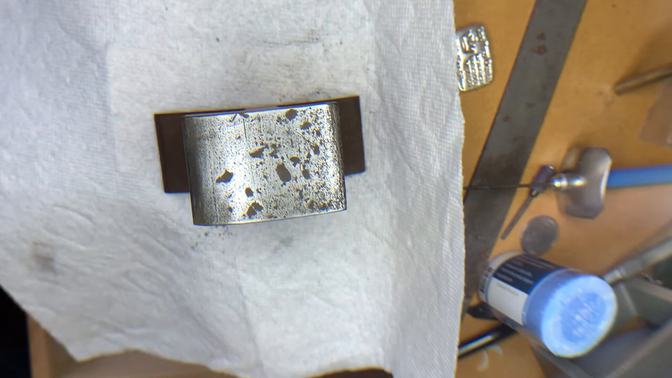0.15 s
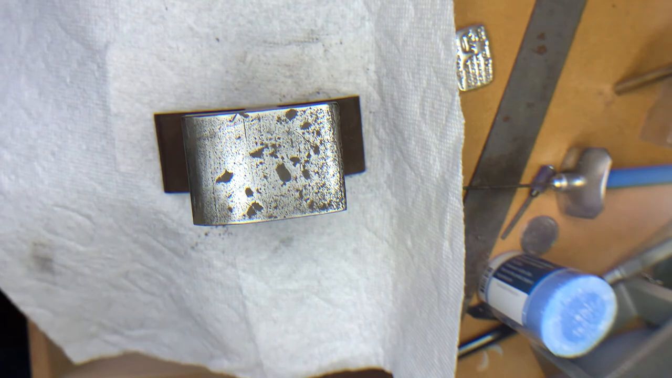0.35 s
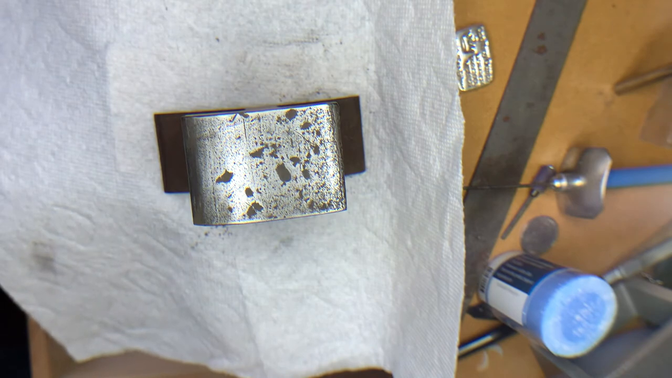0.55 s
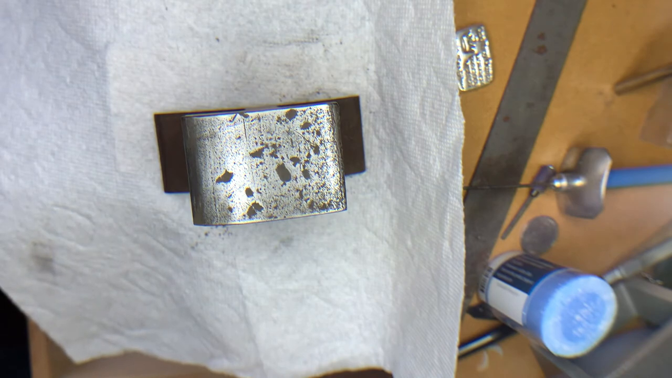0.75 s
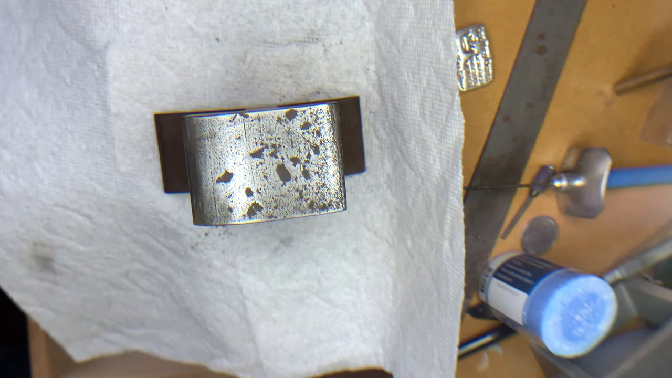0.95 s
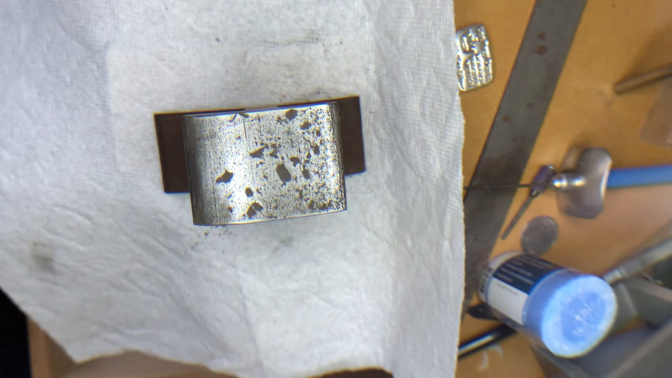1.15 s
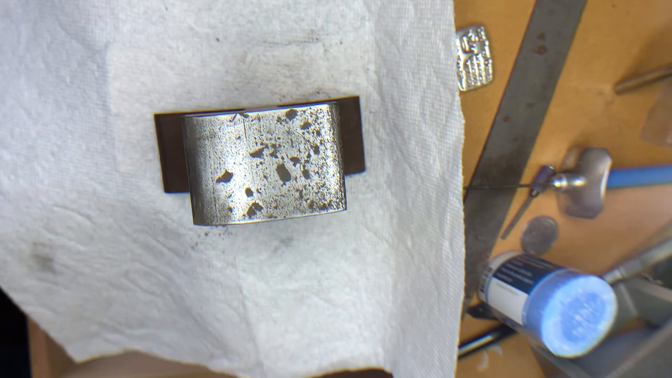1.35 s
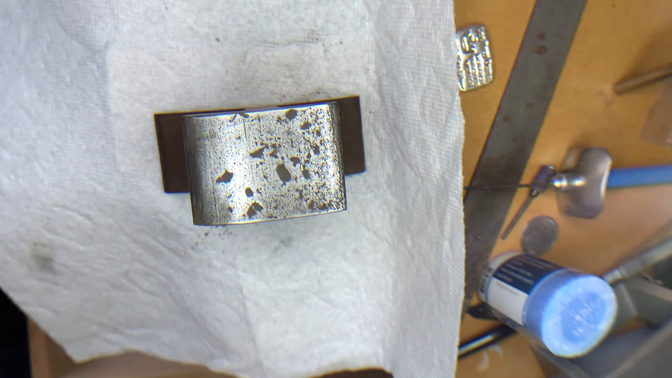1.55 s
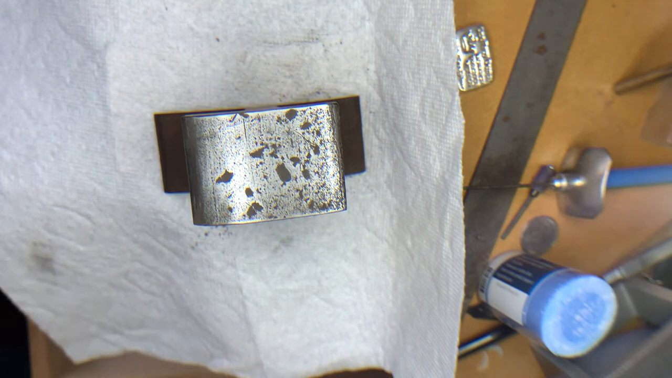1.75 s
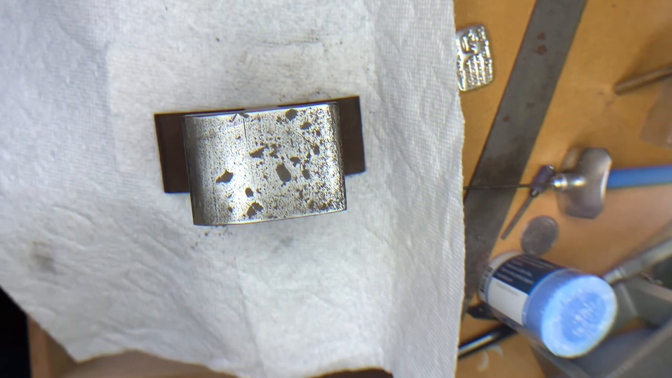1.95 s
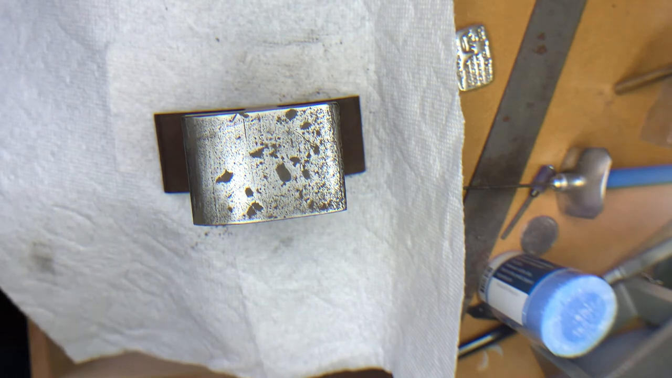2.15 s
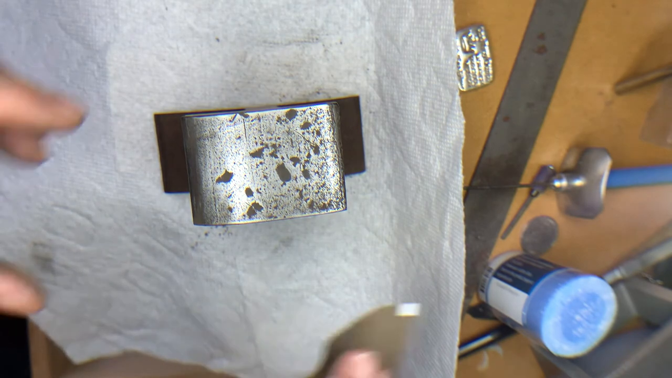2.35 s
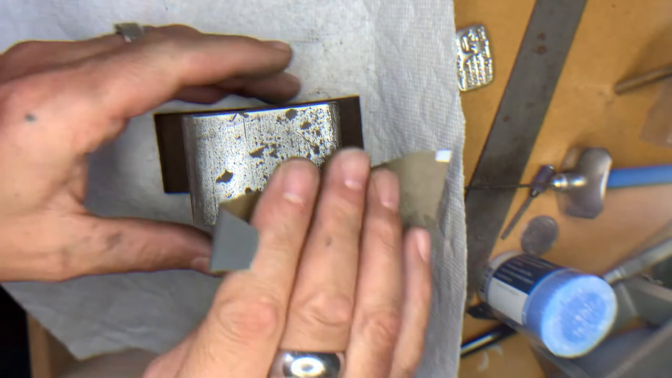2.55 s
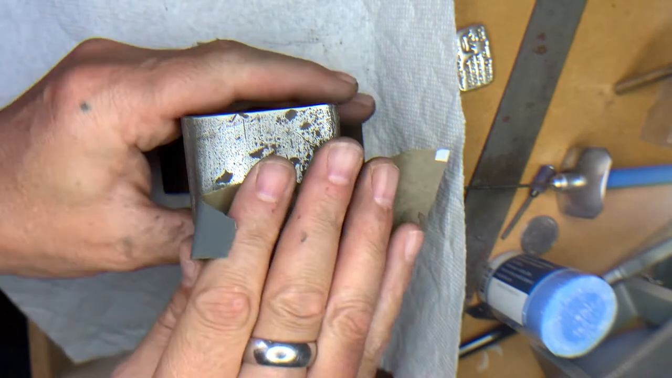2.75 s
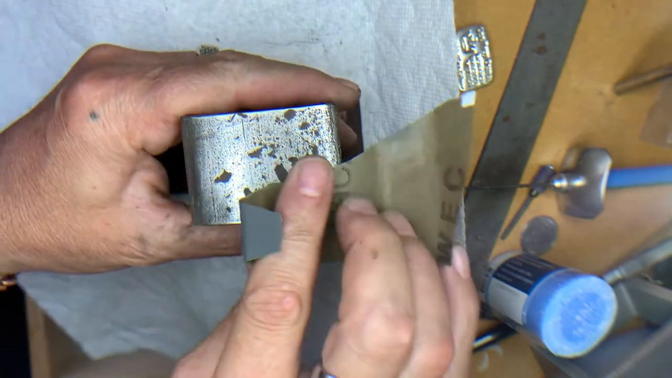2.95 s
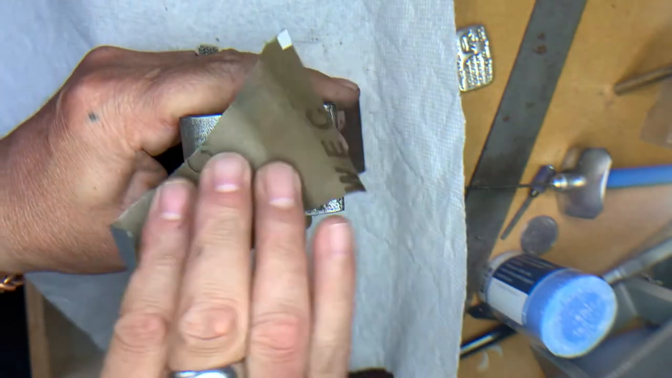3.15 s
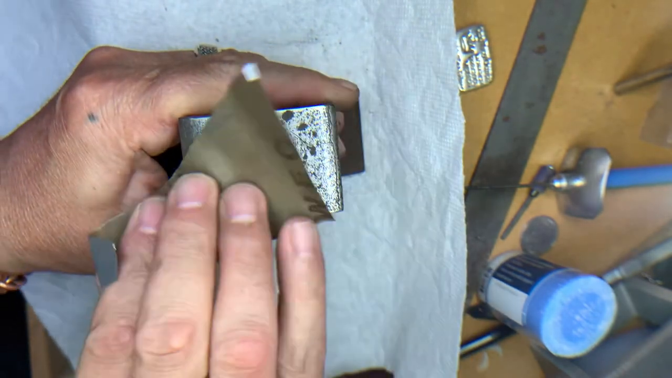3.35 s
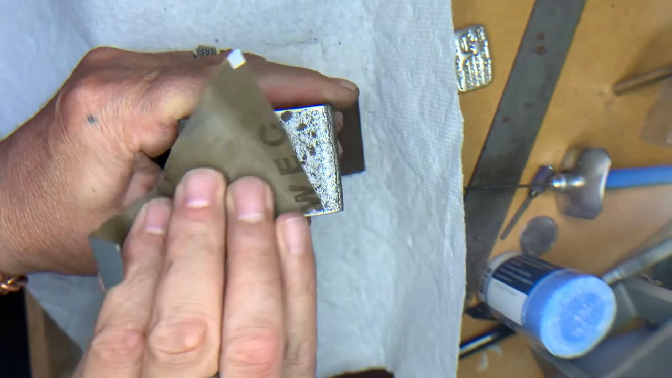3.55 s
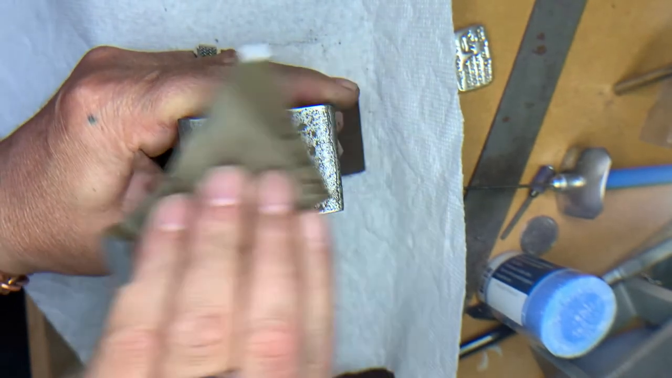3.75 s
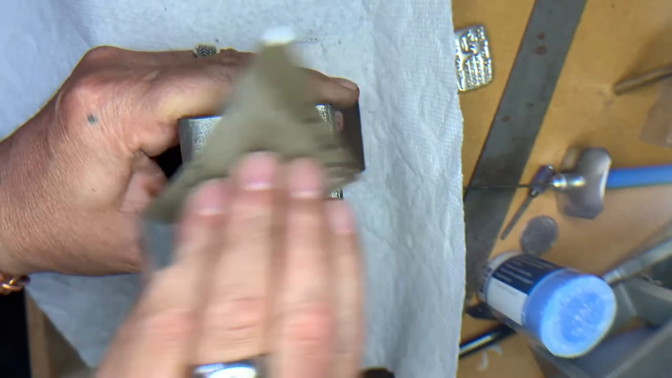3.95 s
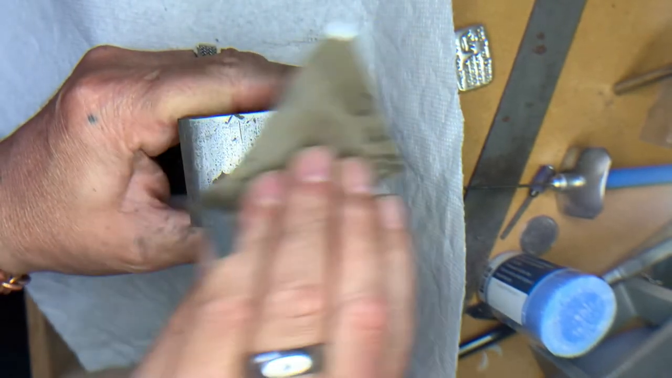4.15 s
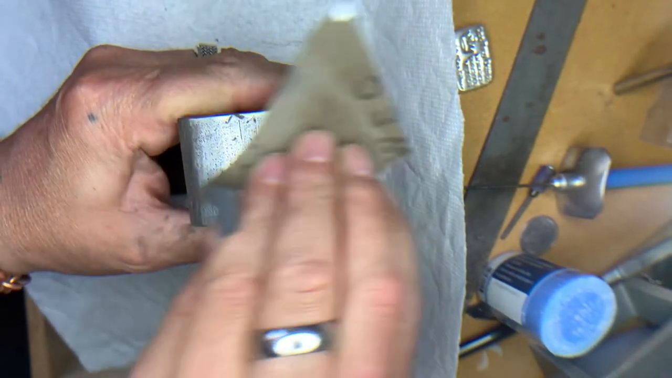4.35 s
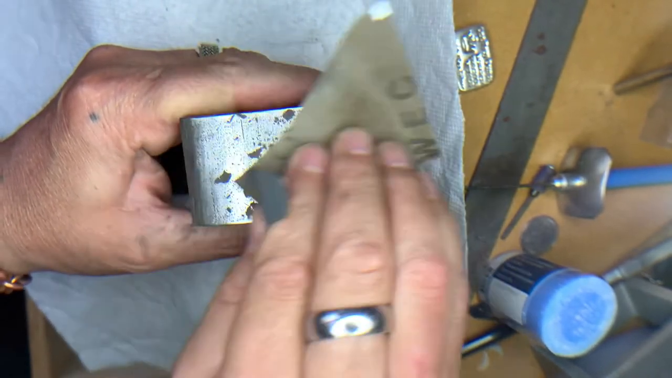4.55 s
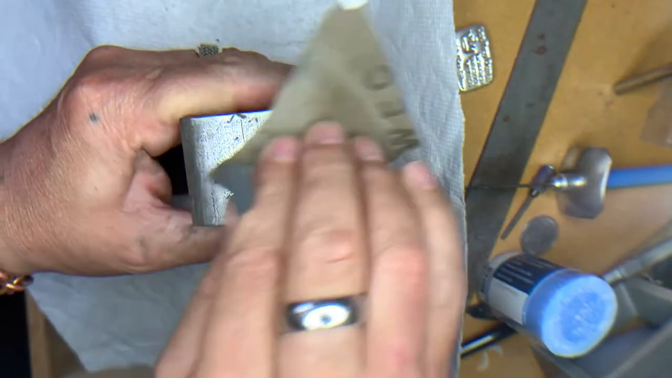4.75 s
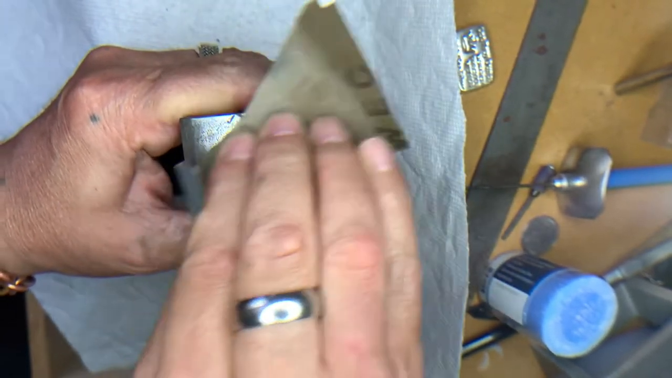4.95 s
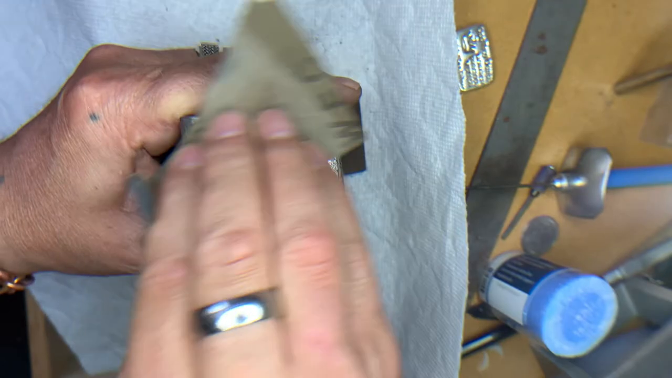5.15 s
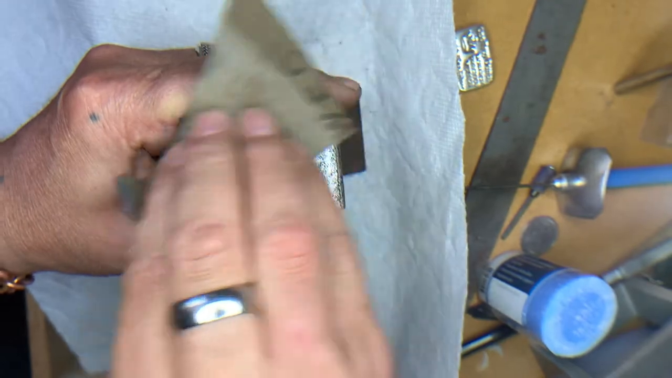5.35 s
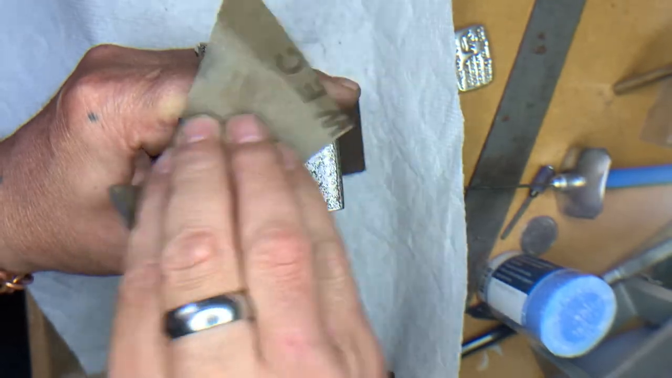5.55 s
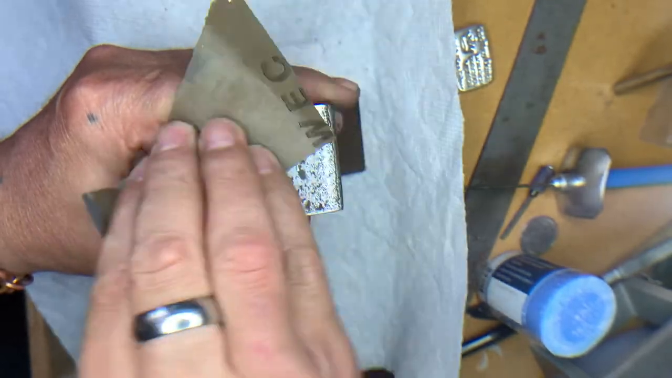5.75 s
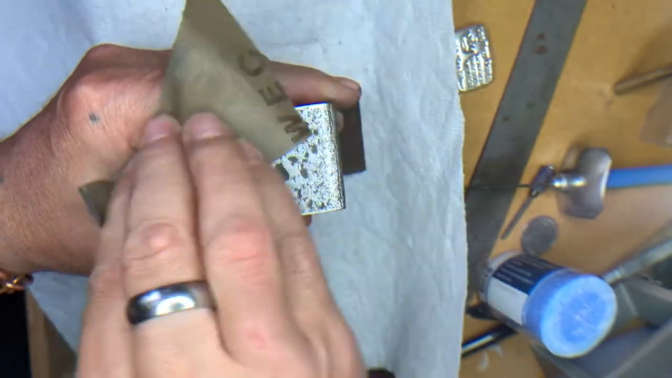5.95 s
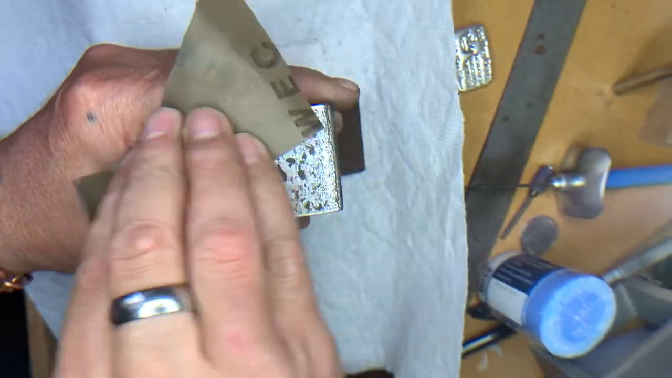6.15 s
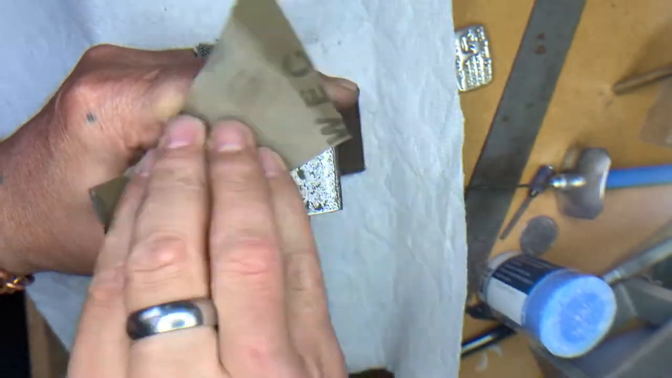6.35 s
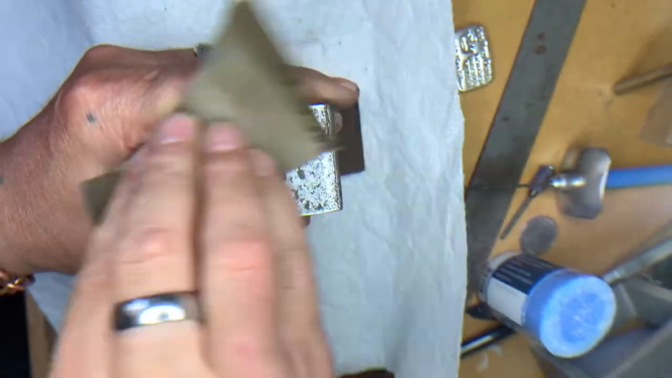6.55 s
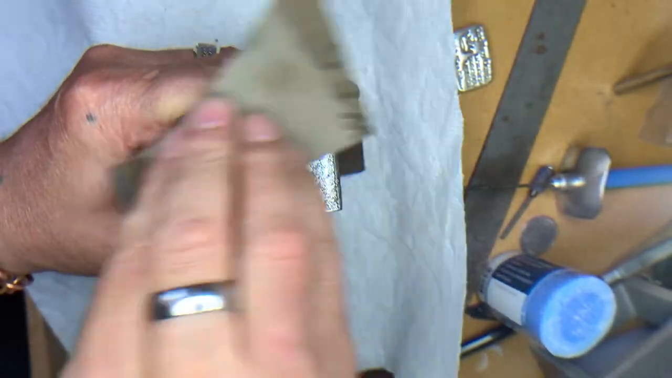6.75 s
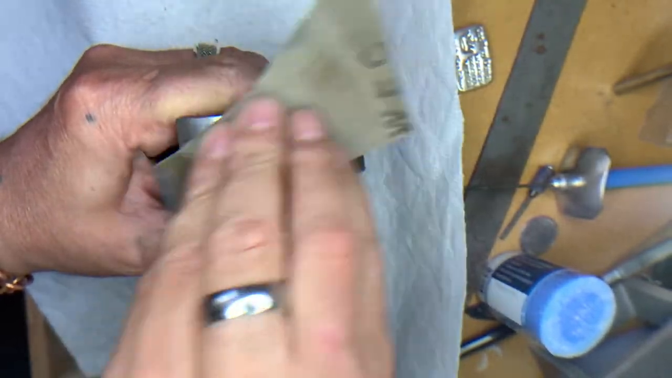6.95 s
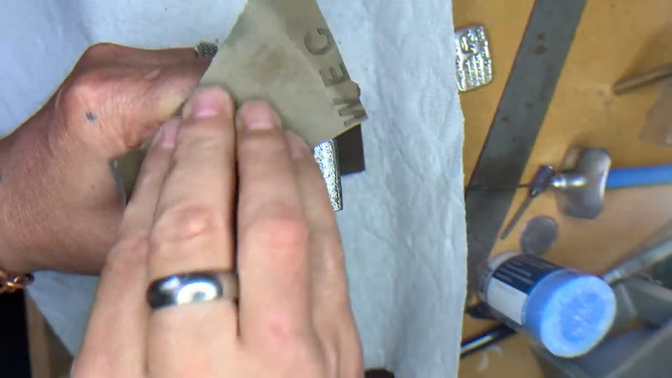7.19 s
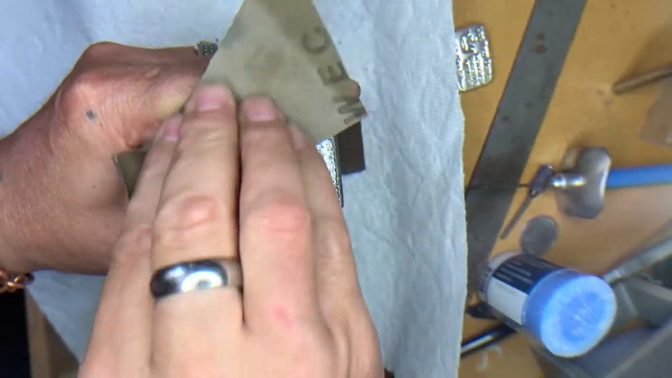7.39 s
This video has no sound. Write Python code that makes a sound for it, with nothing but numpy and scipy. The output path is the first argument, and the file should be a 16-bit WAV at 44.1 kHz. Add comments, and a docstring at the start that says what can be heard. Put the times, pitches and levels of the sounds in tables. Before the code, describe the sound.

Wooden knocks and crisp snaps of stiff sandpaper at a workbench, then fast, steady, scratchy hand sanding on a small steel block.

```python
"""At a workbench in a small room, heard close up: something wooden slides and bumps, and sandpaper is creased.
Then the paper is rubbed to and fro over a small steel block, about nine strokes a second once it is going.
Showers of tiny random impacts make the scraping, rasping, hissing and crackling.
Short decaying swings make the knocks, clacks and snaps; filtered noise rings wood, block and bench.
Gliding tones make squeaks and thuds, and steady tones a thin metal ring."""
import sys
import numpy as np
from scipy import signal
from scipy.fft import rfft, irfft, next_fast_len
from scipy.io import wavfile
from scipy.ndimage import map_coordinates

SR = 44100
rng = np.random.default_rng(int(sys.argv[2]) if len(sys.argv) > 2 else 0)


def log_audio(samples):
    """Write samples as a 16-bit WAV file to the path given in sys.argv[1]."""
    # one column per channel
    frames = np.atleast_2d(samples).T
    # limit to full scale, then quantise
    limited = np.clip(frames, -1, 1)
    pcm = np.round(limited * 32767).astype(np.int16)
    wavfile.write(sys.argv[1], SR, pcm)


N = 327219
T = np.arange(N) / SR  # the time of every sample, in seconds


def amp(db):
    """Decibels to gain."""
    return 10 ** (np.asarray(db) / 20)


def unit(x):
    """Scale to rms 1."""
    return x / np.sqrt(np.mean(x ** 2) + 1e-20)


def along(points, hz):
    """Read a curve of (Hz, value) points on a log frequency axis."""
    f, v = np.transpose(points)
    return np.interp(np.log(hz + 1), np.log(f + 1), v)


def wobble(rate):
    """A smooth random curve with rate random points a second."""
    points = rng.standard_normal(int(N * rate / SR) + 4)
    return map_coordinates(points, [T * rate])


def filtered(x, response):
    """Multiply the spectrum of x by a complex response of frequency."""
    m = next_fast_len(N + SR // 4)
    return irfft(rfft(x, m) * response(np.fft.rfftfreq(m, 1 / SR)), m)[..., :N]


def shape(points):
    """The response of a broad spectrum, from (Hz, dB) points."""
    return lambda hz: amp(along(points, hz))


def body(modes):
    """A body rings at several resonances, which are summed with alternating sign."""
    def response(f):
        total = 0
        for k, (center, width, db) in enumerate(modes):
            resonance = 1j * f * width / (center * center - f * f + 1j * f * width)
            total = total + (-1) ** k * amp(db) * resonance
        return total
    return response


def noise():
    """Two unrelated white noises."""
    return rng.standard_normal((2, N))


def grit(rate, spread_db):
    """Tiny impacts of uneven size, rate a second, at a steady mean power."""
    chance = np.clip(rate / SR, 1e-4, 1)
    hits = (rng.random(N) < chance) / np.sqrt(chance)
    sizes = amp(spread_db * rng.standard_normal(N))
    return unit(hits * sizes * noise())


def bursts(times, levels_db, t60):
    """Noise jumps up at each contact and falls by 60 dB in t60 seconds."""
    power = np.zeros(N + SR)
    fall = amp(-60 * np.arange(SR // 3) / SR / t60) ** 2
    for s, db in zip(times, levels_db):
        power[round(s * SR):][:len(fall)] += amp(db) ** 2 * fall
    return np.sqrt(power[:N]) * noise()


def struck(drive, response):
    """Send a drive through a response scaled to unit average power gain."""
    norm = np.sqrt(np.mean(np.abs(response(np.linspace(0, SR / 2, 2 ** 12))) ** 2))
    return filtered(drive, response) / norm


def patchy(x, depth_db, width_hz, life):
    """Colour drifts at random: humps about width_hz wide last about life seconds."""
    hz, t, z = signal.stft(x, SR, nperseg=1024)
    rows, cols = np.meshgrid(hz / width_hz, t / life, indexing="ij")
    knots = rng.standard_normal((2, 512, 512))
    field = np.array([map_coordinates(k, [rows, cols], order=1, mode="wrap") for k in knots])
    gain = amp(depth_db * unit(field))
    return signal.istft(z * unit(gain), SR, nperseg=1024)[1][:, :N]


def arch(place, crest, pointed):
    """The speed of a hand movement: nil at place 0 and 1, highest at the crest."""
    lean = np.log(.5) / np.log(np.clip(crest, .1, .9))
    return np.abs(np.sin(np.pi * np.clip(place, 0, 1) ** lean)) ** np.abs(pointed)


def swells(rows):
    """Each movement swells and fades in one arch; gives a gain curve for each dB column."""
    out = np.zeros((len(rows[0]) - 2, N + SR))
    for s, length, *db in rows:
        swell = arch(np.arange(round(length * SR)) / (length * SR), crest=0.37, pointed=1)
        out[:, round(s * SR):][:, :len(swell)] += amp(db)[:, None] * swell
    return out[:, :N]


def envelope(start, attack, hold, t60):
    """Rise, stay until hold seconds after the start, die away."""
    return np.clip((T - start) / attack, 0, 1) * amp(-60 * np.maximum(T - start - hold, 0) / t60)


def judder(s, length, hz, width, db):
    """One resonance, driven by noise as by rough friction, swells and fades."""
    out, t = np.zeros((2, N + SR)), np.arange(SR // 4) / SR
    ring = np.exp(-np.pi * width * t) * np.sin(2 * np.pi * hz * t)
    drive = rng.standard_normal((2, 2 * len(t)))
    tone = signal.fftconvolve(drive, ring[None], "valid", axes=1)[:, :len(t)]
    age = t / length * 3  # the swell is highest at a third of the length
    swell = age ** 2 * np.exp(2 - 2 * age)
    burst = tone * swell
    level = amp(db) * np.sqrt(2 * np.sum(swell ** 2) / np.sum(burst ** 2))
    out[:, round(s * SR):][:, :len(t)] += level * burst
    return out[:, :N]


def clacks(times, levels_db, pitches_hz, cycles):
    """Hard contacts: a swing whose envelope peaks after so many cycles, then dies quickly."""
    out, t = np.zeros((2, N + SR)), np.arange(SR // 16) / SR
    for s, db, hz in zip(times, levels_db, pitches_hz):
        age = t * hz / cycles
        swing = age * np.exp(1 - age) * np.sin(2 * np.pi * hz * t)
        out[0, round(s * SR):][:len(t)] += amp(db) * swing
    return out[:, :N]


# How long the room rings. Each row: frequency in Hz, time to fall by 60 dB in seconds.
ROOM_DECAY = [(150, 0.22), (1000, 0.24), (4000, 0.19), (14000, 0.087)]


def room(x):
    """The walls answer with a short noise tail in which each frequency dies at its own speed."""
    hz, t, z = signal.stft(rng.standard_normal((2, SR // 2)), SR, nperseg=256)
    fall = amp(-60 * t / along(ROOM_DECAY, hz)[:, None])
    tail = signal.istft(z * fall, SR, nperseg=256)[1]
    return signal.fftconvolve(x, tail / np.linalg.norm(tail[0]), axes=1)[:, :N]


# How alike left and right are. Each row: frequency in Hz, likeness from 0 to 1.
LIKENESS = [(100, .9), (350, .88), (700, .65), (2000, .45), (6500, .4), (8500, .95), (15000, .92)]
# The phase between left and right. Each row: frequency in Hz, lead of the left in radians (minus: it lags).
LEFT_LEAD = [(0, 0), (300, -.3), (1100, -1.8), (1900, -.1), (3200, -2.8), (5600, -8.6), (6700, -6.1),
             (8600, -9.4), (16000, -19)]


def ports(pair):
    """Two close microphone ports share part of the sound; the left one lags in phase."""
    def turn(hz):
        return np.arccos(np.clip(along(LIKENESS, hz), 0, 1)) / 2

    def lead(hz):
        return np.exp(.5j * np.interp(hz, *np.transpose(LEFT_LEAD)) * np.array([[1], [-1]]))

    # the first signal goes to both ports, the second with opposite signs
    mid, side = filtered(pair, lambda hz: np.array([np.cos(turn(hz)), np.sin(turn(hz))]))
    return filtered(np.array([mid + side, mid - side]), lead)


# How the bench top rings. Each row: frequency in Hz, width in Hz, level in dB.
BENCH_MODES = [(57, 44, -2), (156, 40, 4), (277, 47, -2.5), (321, 94, -4)]
# The colour of the room's air noise. Each row: frequency in Hz, relative level in dB per Hz.
AIR_SPECTRUM = [(20, -36), (50, 5.5), (130, -7.5), (250, -20.5), (600, -19.5), (2000, -14), (6000, -25),
                (15000, -40)]
REST_DB, LEAN_DB = -71.5, -62.5  # the bench shakes more as the hands lean in
LEAN_FROM_S, LEAN_FULL_S = 2.87, 5.1


def bench():
    """The working hands shake the bench top: low noise through its resonances, over steady air noise."""
    lean_db = np.interp(T, [LEAN_FROM_S, LEAN_FULL_S], [REST_DB, LEAN_DB])
    shake = amp(lean_db + wobble(18))
    low_band = shape([(22, -14), (50, 0), (400, 0), (1500, -14)])
    hum = filtered(noise(), lambda hz: body(BENCH_MODES)(hz) * low_band(hz))
    hum = patchy(hum, depth_db=2.5, width_hz=65.5, life=.07)
    air = filtered(noise(), shape(AIR_SPECTRUM))
    return shake * unit(hum) + amp(-69.0) * unit(air)


# How the rolling thing rings. Each row: frequency in Hz, width in Hz, level in dB.
ROLLER_MODES = [(127, 17, 4.5), (252, 40, 4.5), (293, 50, 2.5), (1210, 330, -11), (1700, 84, -7),
                (2200, 460, -9.5)]
ROLL_START_S, ROLL_HOLD_S, ROLL_T60, ROLL_DB = 1.89, 0.14, 1.94, -59  # T60 in seconds


def rolling():
    """Something rolls nearby and runs out: sparse impacts through low resonances, fading slowly."""
    band = shape([(40, -15), (100, 0), (2500, 0), (5000, -20)])
    roll = filtered(grit(900, spread_db=0.0), lambda hz: body(ROLLER_MODES)(hz) * band(hz))
    uneven = unit(roll * amp(1.6 * wobble(24.9)))
    return amp(ROLL_DB) * envelope(ROLL_START_S, attack=0.051, hold=ROLL_HOLD_S, t60=ROLL_T60) * uneven


# Something metal rings. Each row: frequency in Hz, level in dB.
METAL_TONES = [(1320, -49), (3122, -54), (4328, -59), (7350, -63), (9030, -52), (9895, -57)]


def metal():
    """Something metal rings thinly at the start: fading tones with a slightly restless phase."""
    ring = sum(amp(db) * np.sin(2 * np.pi * hz * T + .7 * wobble(114)) for hz, db in METAL_TONES)
    return np.array([ring * envelope(0, attack=.002, hold=0.027, t60=.2), np.zeros(N)])


# How the wood rings. Each row: frequency in Hz, width in Hz, level in dB.
WOOD_MODES = [(157, 16, 0.5), (279, 56, 2.5), (440, 60, 1.5), (680, 35, 7.5), (828, 27, 3), (948, 58, 1.5),
              (1280, 210, -1), (1840, 200, -11.5), (2720, 310, -12)]
# The colour of wood on wood. Each row: frequency in Hz, relative level in dB per Hz.
KNOCK_SPECTRUM = [(100, -9), (300, -7), (550, -8), (950, -0.5), (1500, -19), (2800, -14.5), (5000, -23),
                  (9000, -44), (15000, -39)]
SLIDE_DB, SLIDE_S, SLIDE_T60 = -42, 0.062, 0.35  # level, time until it fades in s, time to fall 60 dB in s


def wood_slide():
    """Wood slides on wood, then stops: dense tiny impacts ring the wood and die away."""
    slide = filtered(grit(5000, spread_db=-2.5),
                     lambda hz: (body(WOOD_MODES)(hz) + 1.5) * shape(KNOCK_SPECTRUM)(hz))
    return amp(SLIDE_DB) * envelope(0, attack=0.00058, hold=SLIDE_S, t60=SLIDE_T60) * unit(slide)


# Wood is bumped. Each row: start in seconds, clack level in dB, clack pitch in Hz, wood ring level in dB.
WOOD_KNOCKS = [(0.0569, -18, 950, -24.5), (.0635, -18, 625, -20.5), (0.0672, -26.5, 560, -23.5),
               (.081, -22, 716, -25), (.171, -38, 1230, -55), (0.41, -62, 590, -44.5),
               (.925, -39, 605, -35.5), (1.3037, -29.5, 920, -41), (1.427, -44, 706, -48),
               (1.46, -23, 1500, -44), (1.467, -33, 1550, -47), (1.698, -37, 484, -41),
               (1.726, -38.5, 1080, -41.5), (1.812, -45, 750, -42), (1.902, -42.5, 503, -51)]


def taps():
    """Each contact clacks and sends a noise burst through the resonances of the wood."""
    s, db, hz, ring_db = np.transpose(WOOD_KNOCKS)

    def wood(f):
        ring = body(WOOD_MODES)(f) * shape([(3000, 0), (8000, -25)])(f)
        return ring + 0.51 * shape(KNOCK_SPECTRUM)(f)

    return clacks(s, db, hz, cycles=0.55) + struck(bursts(s, ring_db, t60=0.03), wood)


# Soft weights land on the bench top. Each row: start in seconds, thump level in dB.
SOFT_LANDINGS = [(0.063, -35), (0.927, -44), (1.433, -48.5), (1.533, -35.5)]
THUD_S, THUD_GLIDE_S = 0.0057, 0.0067  # time to the peak, speed of the fall in pitch
THUD_START_HZ, THUD_END_HZ = 292, 89  # the pitch falls as the weight settles


def thuds():
    """A low thump falls in pitch, while a noise burst makes the bench shudder shortly."""
    out, t = np.zeros((2, N + SR)), np.arange(SR // 8) / SR
    hz = THUD_END_HZ + (THUD_START_HZ - THUD_END_HZ) * np.exp(-t / THUD_GLIDE_S)
    thump = t / THUD_S * np.exp(1 - t / THUD_S) * np.sin(2 * np.pi * np.cumsum(hz) / SR)
    for s, db in SOFT_LANDINGS:
        out[0, round(s * SR):][:len(t)] += amp(db) * thump
    s, db = np.transpose(SOFT_LANDINGS)
    low_cut = shape([(30, -20), (100, 0)])
    shudder = struck(bursts(s, db - 8, t60=0.06), lambda hz: body(BENCH_MODES)(hz) * low_cut(hz))
    return out[:, :N] + shudder


# Hands settle on a paper towel. Each row: start in seconds, length in seconds, level in dB.
TOWEL_TOUCHES = [(2.51, 0.14, -64.5), (2.772, 0.11, -58.5), (2.97, 0.094, -51.5)]


def towel():
    """Hands settle on a paper towel: soft grains, strongest near 900 Hz, swell with each movement."""
    rub = filtered(grit(3000, spread_db=3.0),
                   shape([(100, -1), (400, 4.5), (900, 7.5), (2000, 2.5), (6000, -13.5)]))
    return swells(TOWEL_TOUCHES)[0] * unit(rub)


# Stiff paper and wood snap sharply. Each row: start in seconds, level in dB, pitch in Hz.
SHARP_SNAPS = [(0.057, -36, 1860), (0.0646, -47, 2730), (.082, -37, 1990), (0.274, -49, 2870),
               (0.412, -43.5, 1840), (0.741, -54, 3450), (0.837, -45.5, 5130), (0.932, -37.5, 4150),
               (0.998, -49, 4200), (1.049, -55, 3580), (1.071, -53, 3560), (1.11, -49, 4050),
               (1.132, -41.5, 3100), (1.139, -33.5, 3320), (1.191, -45, 4600), (1.236, -56, 3350),
               (1.303, -35.5, 4520), (1.317, -36.5, 3650), (1.364, -44, 4830), (1.401, -45, 4840),
               (1.42, -46, 4880), (1.443, -34, 4800), (1.46, -35, 1970), (1.531, -38, 4530),
               (1.531, -39.5, 2040), (1.724, -44, 2130), (1.811, -44, 1706), (1.814, -39.5, 3240),
               (1.901, -51, 1970), (2.017, -57, 1480), (2.195, -49, 2140), (2.513, -52, 1590)]
SNAP_T60 = 0.067  # seconds for the crack to fall by 60 dB
SNAP_TAIL_DB, SNAP_TAIL_T60 = -24, 0.15  # the sheet quivers on after it


def snaps():
    """Each snap is a short swing plus a fading noise burst, peaked around its own pitch."""
    out, t = np.zeros((2, N + SR)), np.arange(SR // 8) / SR
    fall = amp(-60 * t / SNAP_T60) + amp(SNAP_TAIL_DB - 60 * t / SNAP_TAIL_T60)

    def band(x, hz, q):
        return signal.lfilter(*signal.iirpeak(min(hz, SR / 4), q, SR), x)

    for s, db, hz in SHARP_SNAPS:
        crack = fall * rng.standard_normal((2, len(t)))
        broad = band(band(crack, hz, .6), hz, .6)
        snap = broad + 1.8 * band(broad, hz, 11)
        level = amp(db - 4.0) * np.sqrt(2 * np.sum(fall ** 2) / np.sum(snap ** 2))
        out[:, round(s * SR):][:, :len(t)] += level * snap
    return out[:, :N] + clacks(*np.transpose(SHARP_SNAPS), cycles=3.6)


# Fingers slip on the sheet.
# Each row: start in seconds, length in seconds, first and last pitch in Hz, level in dB.
FINGER_SLIPS = [(0.182, 0.16, 3830, 3750, -66), (1.312, 0.032, 3600, 3810, -58),
                (1.401, .06, 4860, 4860, -50), (2.238, .04, 4750, 5000, -66)]
SQUEAK_ROUGH = .012  # unsteadiness, as a share of the pitch


def squeaks():
    """Brief finger slips sing on one unsteady, gliding pitch."""
    out = np.zeros((2, N + SR))
    for s, length, from_hz, to_hz, db in FINGER_SLIPS:
        place = np.arange(round(length * SR)) / (length * SR)
        glide = from_hz + (to_hz - from_hz) * place
        hz = glide * (1 + SQUEAK_ROUGH * wobble(600)[:len(place)])
        tone = arch(place, 0.36, 0.62) * np.sin(2 * np.pi * np.cumsum(hz) / SR)
        out[0, round(s * SR):][:len(place)] += amp(db) * tone
    return out[:, :N]


# The sheet shifts in the fingers.
# Each row: start in seconds, length in seconds, crackle in dB, grit brushing in dB.
SHEET_SHIFTS = [(.26, 0.093, -59, -84), (.51, 0.19, -63.5, -73.5), (.7, 0.24, -68, -84),
                (.82, 0.25, -54, -73), (1.03, 0.2, -57, -68), (1.18, 0.12, -53.5, -65),
                (1.39, 0.14, -45.5, -55), (1.51, 0.12, -59, -69), (1.785, 0.071, -51.5, -64),
                (1.86, 0.091, -52.5, -59.5), (2.0, 0.06, -62, -65.5), (2.13, 0.11, -58.5, -66),
                (2.31, 0.1, -63, -67), (2.505, 0.09, -53.5, -57.5), (2.57, 0.22, -61, -82)]
# The colour of the crackle. Each row: frequency in Hz, relative level in dB per Hz.
PAPER_SPECTRUM = [(300, -6), (1000, -2), (1600, 2.5), (2500, 0), (3200, 5.5), (3900, 5.5), (4700, 2.5),
                  (6000, 0.5), (7600, -9.5), (9000, -15), (10500, -10), (15500, -45)]
# The colour of the hissing grit. Each row: frequency in Hz, relative level in dB per Hz.
HISS_SPECTRUM = [(4500, -40), (6200, -11), (7000, -1.5), (7800, -3), (8400, -1), (10500, 1.5), (12500, 0),
                 (15700, -2)]
HELD_FROM_S, HELD_FOR_S, HELD_DB = 0.78, 1.7, -74.5  # the sheet crackles faintly as long as it is held
CLUMP_DB, CLUMP_RATE = 3, 98  # the crackle comes in clumps: depth, random points a second


def paper_handling():
    """Stiff paper crackles in clumps of tiny impacts, and its grit brushes in a brighter band."""
    rustle, brush = swells(SHEET_SHIFTS)
    held = amp(HELD_DB) * envelope(HELD_FROM_S, attack=0.03, hold=HELD_FOR_S, t60=0.33)
    clumps = grit(3500, spread_db=-0.5) * amp(CLUMP_DB * wobble(CLUMP_RATE))
    crackle = patchy(filtered(clumps, shape(PAPER_SPECTRUM)), depth_db=3, width_hz=300, life=.05)
    softer_top = shape([(9000, 0), (12000, -6), (16000, -9)])
    brushing = filtered(grit(4000, spread_db=3), lambda hz: shape(HISS_SPECTRUM)(hz) * softer_top(hz))
    brushing = patchy(brushing, depth_db=3, width_hz=400, life=.05)
    return np.hypot(rustle, held) * unit(crackle) + brush * unit(brushing)


# The bench top drones briefly. Each row: start in seconds, pitch in Hz, level in dB.
BENCH_DRONES = [(2.846, 172, -59.5), (3.13, 184, -61), (4.24, 181, -63), (4.499, 164, -59),
                (4.671, 155, -57), (4.91, 314, -57), (5.1, 320, -58), (5.27, 320, -58), (5.64, 83.5, -58),
                (5.96, 180, -58), (6.17, 313, -56.5), (6.25, 154, -58), (6.566, 347, -55.5),
                (6.795, 331, -47.5), (7.364, 329, -50)]
DRONE_S, DRONE_WIDTH_HZ = 0.081, 7.8


def drones():
    """The bench top drones along: narrow low resonances swell and fade under rough friction."""
    return sum(judder(s, DRONE_S, hz, DRONE_WIDTH_HZ, db) for s, hz, db in BENCH_DRONES)


# The block rocks on its foot. Each row: start in seconds, level in dB.
BLOCK_ROCKS = [(3.0, -42), (3.497, -43), (3.568, -36), (3.721, -39), (3.938, -45), (4.757, -44),
               (4.974, -47), (5.013, -44), (6.091, -37.5), (6.251, -49), (6.289, -39), (6.458, -47.5),
               (6.574, -36.5), (6.752, -47)]
# How the foot rings. Each row: frequency in Hz, width in Hz, level in dB.
FOOT_MODES = [(447, 47, 1), (725, 15, 3), (1020, 36, 6), (1474, 100, 2.5)]
FALL_BACK_S = .0075  # the second contact follows, just as strong
CLACK_HZ, CLACK_DB, FOOT_DB = 1200, 1.5, -3.5  # both levels are added to the row's level


def rocking():
    """The block tips and falls back: two hard clacks, and noise bursts ring its foot shortly."""
    s, db = np.transpose(BLOCK_ROCKS)
    s, db = np.r_[s, s + FALL_BACK_S], np.r_[db, db]
    clack = clacks(s, db + CLACK_DB, np.full(len(s), CLACK_HZ), cycles=0.65)
    return clack + struck(bursts(s, db + FOOT_DB, t60=0.016), body(FOOT_MODES))


# The paper catches and judders. Each row: start in seconds, pitch in Hz, level in dB.
PAPER_GRABS = [(3.326, 4000, -44), (3.45, 3800, -46.5), (3.655, 1720, -47.5), (4.77, 2560, -42.5),
               (5.006, 1810, -44), (5.072, 3570, -45), (5.95, 1870, -36), (5.954, 2610, -40.5),
               (6.11, 3570, -40.5), (6.16, 3730, -42.5), (6.274, 2810, -43)]
GRAB_S, GRAB_Q = 0.033, 18.5  # length, and sharpness of the resonance (pitch / width)


def grabs():
    """The paper catches and judders: a resonance swells and fades under rough friction."""
    return sum(judder(s, GRAB_S, hz, hz / GRAB_Q, db) for s, hz, db in PAPER_GRABS)


# One push or pull each, in turn. Each row: start in seconds, length in seconds,
# place of top speed from 0 to 1, low scrape in dB, rasp in dB, hiss in dB.
SANDING_STROKES = [(2.816, 0.18, 0.36, -66.5, -56, -60), (2.955, 0.23, 0.44, -61, -47, -42.5),
                   (3.153, 0.13, 0.3, -64.5, -47.5, -41.5), (3.255, 0.17, 0.26, -64.5, -49, -40.5),
                   (3.442, 0.062, 0.42, -61.5, -51, -54), (3.489, 0.1, 0.43, -63.5, -48.5, -48.5),
                   (3.573, 0.14, 0.4, -57.5, -42.0, -36), (3.693, 0.15, 0.2, -58.5, -45, -37),
                   (3.808, 0.12, 0.34, -57, -42, -37), (3.914, 0.13, 0.26, -58.5, -46.0, -36.5),
                   (4.018, 0.14, 0.28, -60, -45, -37), (4.13, 0.12, 0.17, -59, -43.0, -35),
                   (4.23, 0.12, 0.34, -61.5, -42.5, -36.5), (4.334, 0.125, 0.23, -58, -44, -39),
                   (4.44, 0.13, 0.29, -64, -44, -38.5), (4.547, 0.13, 0.12, -54, -43.0, -35.5),
                   (4.654, 0.16, 0.24, -63, -46.5, -41), (4.759, 0.12, 0.28, -53.5, -42, -39.5),
                   (4.87, 0.1, 0.45, -58.5, -48, -46.5), (4.959, 0.124, 0.41, -55, -43.0, -40.5),
                   (5.06, 0.15, 0.31, -60.5, -42.5, -38.5), (5.187, 0.13, 0.29, -57.5, -45, -41),
                   (5.293, 0.13, 0.3, -57.5, -44.5, -40.5), (5.398, 0.14, 0.19, -58.5, -45.0, -38),
                   (5.504, 0.14, 0.35, -63, -45.0, -41.5), (5.616, 0.15, 0.16, -57, -43, -39),
                   (5.726, 0.12, 0.34, -62.5, -44.5, -39), (5.828, 0.13, 0.36, -59, -44.5, -40.5),
                   (5.94, 0.14, 0.26, -58.5, -39.5, -37), (6.066, 0.11, 0.34, -57.5, -43, -40.5),
                   (6.157, 0.15, 0.21, -59.5, -44.5, -39.5), (6.268, 0.13, 0.25, -59, -44, -37.5),
                   (6.379, 0.13, 0.34, -62, -47, -41), (6.481, 0.15, 0.35, -61.5, -43, -40),
                   (6.605, 0.12, 0.19, -60, -42.5, -37.5), (6.709, 0.14, 0.31, -59, -46, -41),
                   (6.817, 0.13, 0.29, -60.5, -45, -41), (6.922, 0.17, 0.18, -60, -46.5, -40),
                   (7.064, 0.14, 0.24, -60, -45.5, -43.5), (7.182, 0.14, 0.29, -57, -46.0, -43),
                   (7.312, 0.12, 0.34, -59.5, -45, -42)]
# How paper, fingers and block ring together. Each row: frequency in Hz, width in Hz, level in dB.
BLOCK_MODES = [(3540, 270, 7.5), (4700, 140, -28), (7400, 150, 1), (8160, 250, 7)]
# The colour of the low scrape. Each row: frequency in Hz, relative level in dB per Hz.
SCRAPE_SPECTRUM = [(150, -25), (350, -5), (750, 5), (1350, -0.5), (1700, 2), (2600, -36)]
# The colour of the rasp. Each row: frequency in Hz, relative level in dB per Hz.
RASP_SPECTRUM = [(700, -41), (1300, -13), (1600, -2.5), (1900, -5.5), (2250, -6), (2650, -1), (3000, -1.5),
                 (3750, 1.5), (4300, -2.5), (4800, 1), (5700, -3.5), (6500, 0), (7400, -12), (10000, -64)]
POINTED, HISS_RISE_S = 1.4, 0.0079  # the speed arch of a stroke, and its start
# a share of the grip is there once loose, the rest swells with speed
RASP_STICK, RASP_FALL, BREAK_LOOSE_S = 0.35, 1.23, 0.0078


def sanding():
    """At each turn the paper breaks loose, scrapes and rasps; its hiss follows the hand's speed."""
    drag, bite, speed, flow = np.zeros((4, N + SR))
    for s, length, crest, scrape_db, rasp_db, hiss_db in SANDING_STROKES:
        t = np.arange(round(length * SR)) / SR
        span = slice(round(s * SR), round(s * SR) + len(t))
        place = t / length
        hand = np.minimum(t / HISS_RISE_S, 1) * arch(place, crest, POINTED)
        stuck = arch(np.maximum(place, crest), crest, RASP_FALL)  # full until the crest
        sliding = arch(place, crest, RASP_FALL)
        grip = np.minimum(t / BREAK_LOOSE_S, 1) * (RASP_STICK * stuck + (1 - RASP_STICK) * sliding)
        speed[span] += hand
        flow[span] += amp(hiss_db) * hand
        bite[span] += amp(rasp_db) * grip
        drag[span] += amp(scrape_db) * grip

    grains = 8000 + 24000 * speed[:N]  # a faster hand meets more grains a second
    hiss = filtered(grit(grains, spread_db=1.0), shape(HISS_SPECTRUM))
    hiss = patchy(hiss, depth_db=2.7, width_hz=359, life=0.035)

    rasp = filtered(grit(grains * .5, spread_db=1.0),
                    lambda hz: shape(RASP_SPECTRUM)(hz) * (1 + 0.15 * body(BLOCK_MODES)(hz)))
    # the colour of the rasp drifts at random in narrow humps
    rasp = patchy(rasp, depth_db=4.0, width_hz=110, life=.045)

    scrape = filtered(grit(grains * .1, spread_db=2.5),
                      lambda hz: shape(SCRAPE_SPECTRUM)(hz) * (1 + 0.41 * body(FOOT_MODES)(hz)))
    flutter = amp(1.2 * wobble(90))
    return flow[:N] * unit(hiss) + flutter * (bite[:N] * unit(rasp) + drag[:N] * unit(scrape))


def scene():
    """The handling is a little louder on the left; the sanding has no such tilt and less room."""
    aside = rolling() + metal() + wood_slide() + taps() + thuds()
    aside = aside + towel() + snaps() + squeaks() + paper_handling()
    work = bench() + drones() + rocking() + grabs() + sanding()
    far = ports(aside + amp(-9) * room(aside)) * amp([[1], [-1]])  # left 1 dB up, right 1 dB down
    near = ports(work + amp(-11) * room(work))
    return far + near


TOP_HZ = 15850


def record(dry):
    """The microphone side keeps nothing at or above its band limit."""
    return filtered(dry, lambda hz: hz < TOP_HZ)


dry = scene()
out = record(dry)
log_audio(out)
```